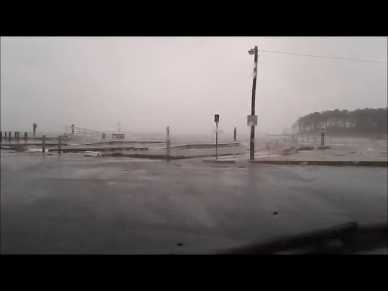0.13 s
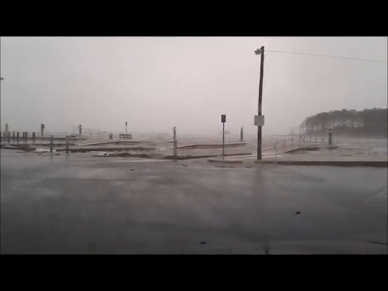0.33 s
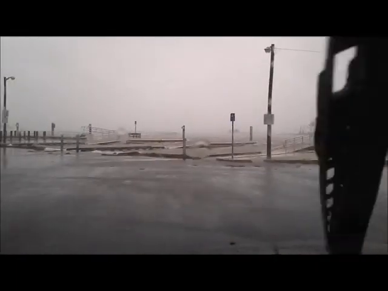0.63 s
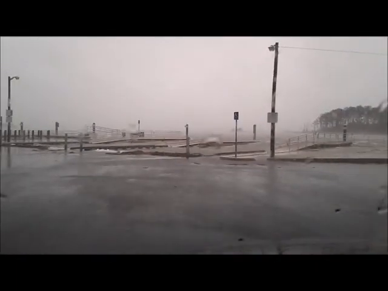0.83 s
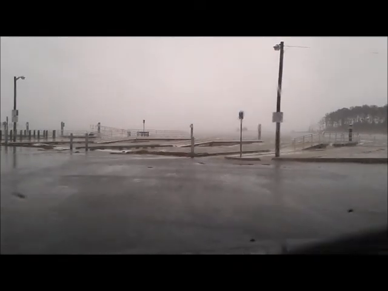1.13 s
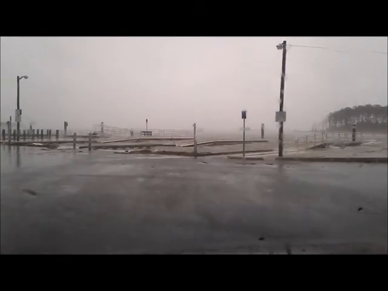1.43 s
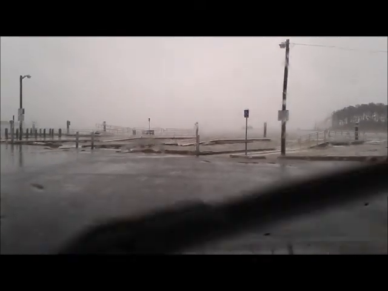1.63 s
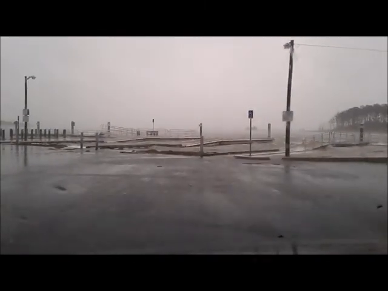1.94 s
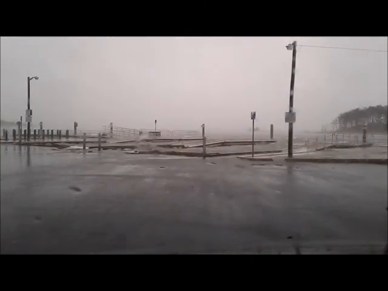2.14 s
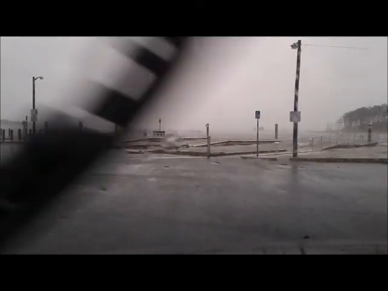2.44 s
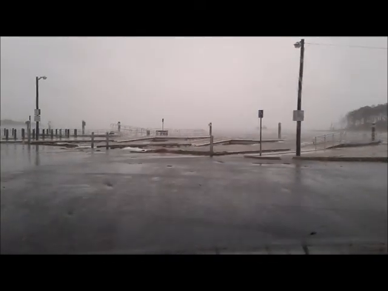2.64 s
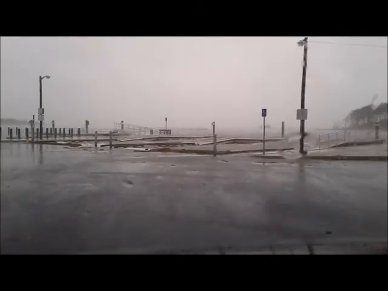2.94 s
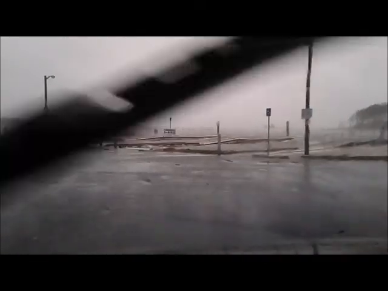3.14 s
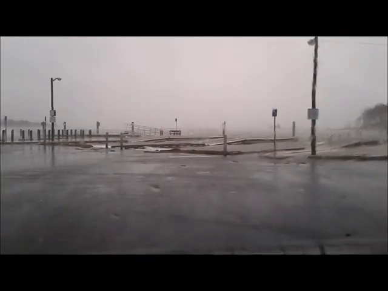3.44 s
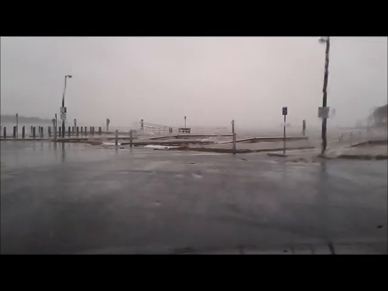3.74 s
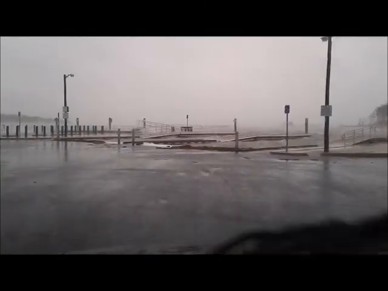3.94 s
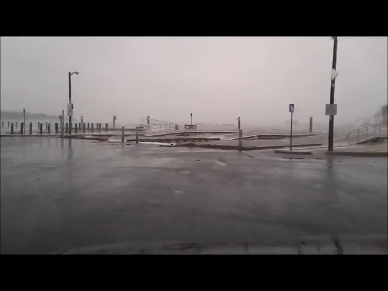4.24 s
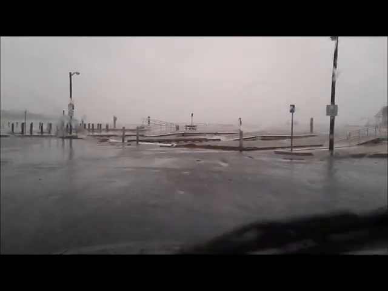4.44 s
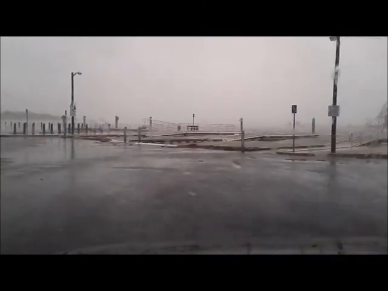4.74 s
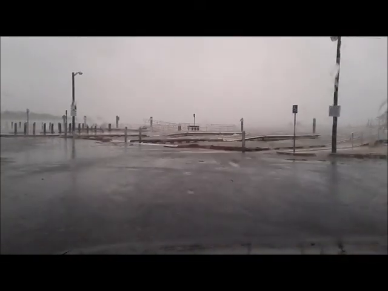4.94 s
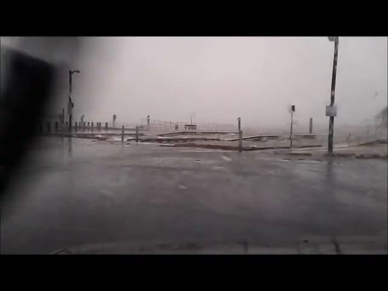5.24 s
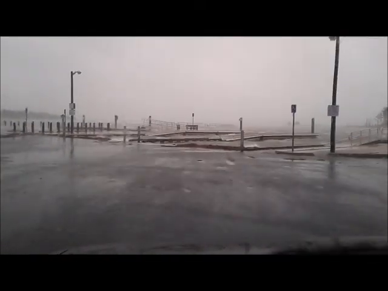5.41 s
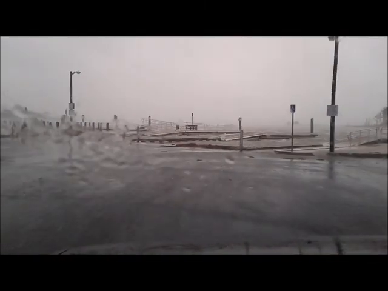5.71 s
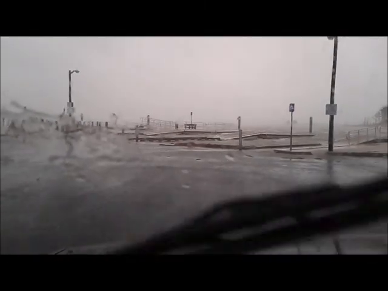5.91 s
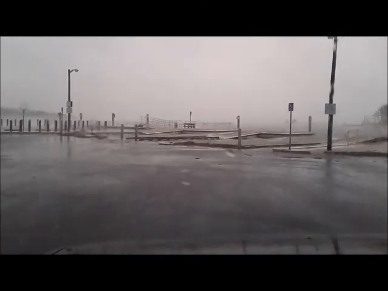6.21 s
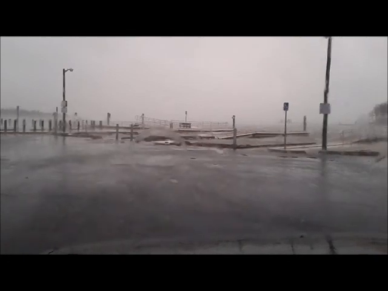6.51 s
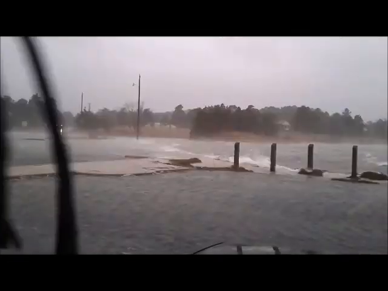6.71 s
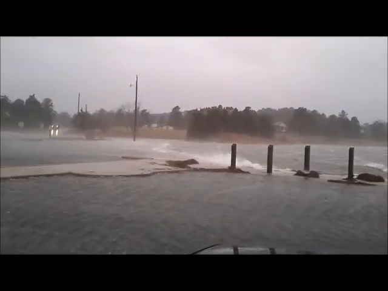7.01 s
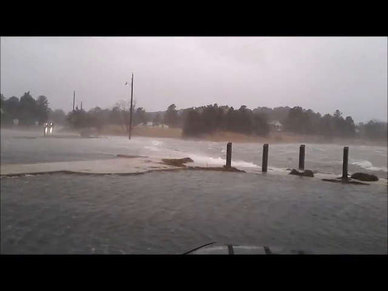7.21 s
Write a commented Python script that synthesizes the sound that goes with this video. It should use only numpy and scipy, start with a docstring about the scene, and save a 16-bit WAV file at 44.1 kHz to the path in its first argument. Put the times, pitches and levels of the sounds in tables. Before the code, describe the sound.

From inside a vehicle standing in a storm, crisp raindrops tick on the glass and panels amid gusty, hissing spray. The cabin sounds close, with very little echo. A steady deep rumble from the bodywork and the hum of the idling engine run throughout, while a wiper blade shudders softly on the windshield several times. The sheet metal takes one duller tap midway, and the sound cuts off suddenly.

```python
"""Inside a parked vehicle, wind-driven rain beats on the glass and roof.
Single drops crack and make the panels knock, over a fine patter that comes in gusts. The roof and doors
drum, and the idling engine hums underneath. A rubber wiper blade groans now and then as it sticks and
slips, and one duller tap rings the sheet metal. The sound stops abruptly shortly before the end."""
import sys
import numpy as np
from scipy import signal
from scipy.fft import rfft, irfft
from scipy.io import wavfile
from scipy.ndimage import uniform_filter1d

SR = 44100
rng = np.random.default_rng(int(sys.argv[2]) if len(sys.argv) > 2 else 0)


def generate_wav(signal):
    """Clip the signal to [-1, 1] and save it as 16-bit WAV at the path in sys.argv[1]."""
    frames = np.transpose(np.atleast_2d(signal))
    scaled = np.clip(frames, -1, 1) * 32767
    pcm = np.round(scaled).astype(np.int16)
    wavfile.write(sys.argv[1], SR, pcm)


N = 324576
STOP_S = 6.7745

# How strong the fine rain is as gusts come and go: (time [s], relative level [dB])
GUSTS = [(0, -47), (.2, -40.5), (.3, -33.5), (.5, -32.5), (.62, -42), (1.05, -40.5), (1.27, -36),
         (1.45, -46), (1.85, -48), (2.1, -39.5), (2.4, -44), (2.5, -36.5), (2.7, -43), (2.8, -46),
         (3.1, -47.5), (3.45, -48.5), (3.53, -39), (3.66, -53), (3.75, -41.5), (4.05, -41.5), (4.17, -45),
         (4.28, -37), (4.5, -42), (4.57, -43.5), (4.6, -31.5), (4.65, -36), (4.8, -40), (4.9, -45),
         (5.25, -46), (5.4, -38), (5.5, -48), (5.7, -45), (5.8, -39.5), (5.93, -40), (6.1, -43),
         (6.23, -41), (6.45, -40), (6.78, -33.5)]
# Short breaks in the rain, and one short surge: (start [s], length [s], level change [dB])
RAIN_BREAKS = [(0.017, 0.13, -10), (0.522, 0.083, -16), (0.797, .18, -14.5), (0.632, 0.038, -10),
               (0.738, 0.07, -14), (1.476, 0.13, -3), (2.146, 0.081, -8), (2.898, 0.14, -4.5),
               (3.626, .05, 6), (4.318, 0.085, -14), (4.415, 0.064, -9), (5.012, 0.14, -16.5),
               (5.418, 0.12, -4), (5.692, 0.044, -9), (6.099, 0.044, -4.5), (6.261, 0.11, -10),
               (6.716, 0.033, -10.5)]
# The tone of fine spray on the glass: (frequency [Hz], relative level [dB])
GLASS_TONE = [(4000, -24), (5500, -5), (7500, -3), (10500, 6), (13000, -5), (16000, -5.5)]
# The tone of fine spray on the roof: (frequency [Hz], relative level [dB])
ROOF_TONE = [(500, -32), (1200, -6), (2000, -11.5), (3300, 0.5), (4500, -6), (6500, -6.5), (9000, -37.5)]
# The tone of faraway rain: (frequency [Hz], relative level [dB])
FAR_RAIN_TONE = [(900, -30), (1800, 0), (4000, -3), (9000, -6), (12000, -10), (15500, -30)]
# How strongly the vehicle's body drums: (time [s], relative level [dB])
DRUMMING = [(0.0, -32.5), (4.54, -34), (4.68, -31), (4.79, -33), (6.64, -32.5), (6.77, -33)]
# The deep tone of that drumming: (frequency [Hz], relative level [dB])
BODY_TONE = [(12, -40.5), (28, -8), (42, 0), (62, -6.5), (88, -0.5), (165, -4), (230, -6.5), (345, -9.5),
             (420, -15.5), (700, -19.5), (1000, -25.5), (1700, -34), (2500, -38), (4000, -62.5)]
# The loudest drops; knock and splatter rise and fall with the crack's level:
# (time [s], crack level [dB], crack pitch [Hz], relative knock [dB], relative splatter [dB])
LOUD_DROPS = [(.0169,-9,10800,-14,-30),(.0573,-22,9000,6.5,-11.5),(.0695,-26,9300,1,-16),(.1613,-17,7000,-13,-29),
              (.2258,-18,10100,1.5,-22),(.2329,-9,11200,-3,-23),(.267,-17,8500,6,-21),(.2744,-5,10800,-7,-19),
              (.3173,-16.5,7000,-9,-16.5),(.3425,-18,10000,-7,-19.5),(.3767,-15.5,10000,-11.5,-9.5),(.4528,-23,9900,-3,-20),
              (.4936,-14,11200,6,-18),(.5652,-17,10300,-5.5,-12),(.6061,-10,11200,-4,-18.5),(.6139,-16,10300,-3,-15.5),
              (.7856,-7.5,7940,-3,-19),(.809,-21,10200,-6,-13),(.841,-23,7500,1.5,-9.5),(.8829,-15.5,11000,-2.5,-15),
              (.9218,-19,10100,-5,-14.5),(.9308,-18,9600,1,-14.5),(.9908,-22,10900,-1,-19),(1.0279,-10.5,11000,-8,-23),
              (1.1046,-18,11200,-12,-12),(1.167,-23,11100,12,-23),(1.204,-7,11200,-9,-23),(1.2336,-8.5,10900,-4.5,-17),
              (1.2571,-13,9400,3,-23),(1.2659,-6,11500,-2,-20),(1.364,-10,10600,-7,-20),(1.454,-10,11200,-4.5,-19.5),
              (1.5122,-18.5,8400,6.5,-23),(1.572,-9.5,9200,-3,-20.5),(1.5844,-20.5,8000,1,-18),(1.7153,-25,9100,8,-14),
              (1.8869,-17,10900,-7,-9),(1.9673,-18,9300,-5,-12),(1.9941,-7.5,8500,-10,-21),(2.0463,-6.5,10100,-17,-12),
              (2.0766,-18,9200,-13,-20),(2.0845,-19,10900,0.5,-7.5),(2.1314,-22,11300,-10,-12),(2.1603,-15.5,9600,-2,-13),
              (2.1939,-21.5,10900,-2.5,-7.5),(2.2314,-16,10700,-0.5,-8),(2.2449,-9,11000,1.5,-17.5),(2.2809,-16,9500,-9,-11.5),
              (2.329,-10.5,11200,-1.5,-22.5),(2.4226,-7.5,10400,-9,-13),(2.4759,-13,10300,0.5,-13),(2.491,-13.5,6600,-10,-14),
              (2.5361,-24,9500,6,-11),(2.6062,-5.5,10100,-15,-15.5),(2.6251,-4,10600,-24,-16),(2.6463,-11.5,9600,-18,-15),
              (2.6903,-13,10400,-20,-15),(2.7074,-15,10700,-14,-21),(2.7751,-19.5,10100,-7.5,-14),(2.8382,-13,10000,1,-18),
              (3.0129,-7.5,10300,-4,-23),(3.0297,-21,9500,-1,-10),(3.0993,-11.5,10300,-9,-20),(3.1118,-17,10100,-12,-14),
              (3.1188,-12.5,10400,-6,-13.5),(3.2176,-12.5,9500,-1,-18),(3.2474,-18,10900,-3.5,-14),(3.2827,-10,9450,-12,-20),
              (3.3036,-20.5,10300,0,-12),(3.3574,-20,8500,-0.5,-14.5),(3.4476,-11.5,11000,-17,-15.5),(3.4597,-24,9700,5,-10),
              (3.5083,-13,10600,-7,-12),(3.6778,-15.5,10100,-19,-14.5),(3.7082,-9,9600,-5,-20.5),(3.7272,-9.5,10000,-10,-10),
              (3.8044,-15,10200,-15,-14),(3.9183,-17,9300,-9,-9),(3.9327,-13,11200,-25,-14),(4.041,-25,10100,-13,-18),
              (4.0887,-13.5,10700,-3,-16),(4.1353,-5,10500,-15.5,-16.5),(4.1788,-9,10300,-11,-14),(4.2626,-21.5,9200,-4,-6.5),
              (4.2866,-13,11200,-16,-17),(4.3067,-12,11000,1,-20),(4.4025,-26,6000,1,-15),(4.5121,-15,9000,-1,-20),
              (4.5937,-10.5,9450,-8.5,-17.5),(4.6056,-15.5,10900,3,-13.5),(4.6214,-30,9100,6.5,-6),(4.7586,-15.5,6000,-4.5,-12),
              (4.8763,-20.5,11100,-14,-14.5),(4.8878,-9,10600,-9,-14),(4.8957,-6.5,10000,-12,-17),(4.9459,-18.5,10300,-1,-11),
              (4.9806,-27.5,8100,9.5,-14),(4.9969,-16,10200,-4,-16),(5.2073,-6,10400,-9,-18),(5.2518,-8.5,11600,2.5,-25),
              (5.272,-14.5,9300,-31.5,-13),(5.3533,-10.5,11000,-19,-12.5),(5.3991,-19,9000,-13,-7),(5.4073,-4,10600,-19,-12.5),
              (5.461,-23,6700,-6,-12),(5.5343,-10.5,11700,-2.5,-18),(5.5482,-28.5,6000,10.5,-12.5),(5.6871,-17.5,9900,-7.5,-15.5),
              (5.7338,-17.5,8800,-5,-15.5),(5.9037,-5.5,9400,-9,-23),(5.9275,-18,9400,1.5,-13.5),(5.9568,-24.5,10200,5,-8),
              (6.022,-20,10500,-12,-13),(6.0961,-10.5,10100,-15.5,-22),(6.1566,-16,10900,-4,-19),(6.1743,-17,10800,-2,-15),
              (6.1984,-15.5,8700,-8,-17),(6.3847,1.5,9400,-19,-21),(6.4079,-14.5,10900,-5.5,-10),(6.4561,-7.5,9200,-5.5,-19),
              (6.4989,-11.5,8700,-2,-14.5),(6.5122,-8,10400,-14.5,-23),(6.5353,-7,10700,0.5,-25),(6.5668,-14,10600,-15,-25),
              (6.5892,-17,9500,-2,-12),(6.6042,-15,9200,-8,-18),(6.6421,-21,11200,-11,-11),(6.6854,-14,9100,-13,-17),
              (6.7028,-12,10700,-18,-22),(6.756,-16,9200,-14,-9),(6.7631,-16,10200,-20,-31)]
# The wiper blade shuddering on the glass: (start [s], length [s], pitch [Hz], level [dB])
WIPER_GROANS = [(.48, .09, 112, -35), (.78, .08, 112, -36), (.895, .08, 112, -30), (2.28, .12, 112, -37),
                (3.3, .11, 158, -35), (3.46, .13, 165, -35), (4.57, .2, 161, -31), (6.15, .13, 160, -38),
                (6.43, .2, 168, -39)]
# A duller tap on the body: (time [s], pitch [Hz], starting level [dB], time to fade by 60 dB [s])
METAL_TAPS = [(3.033, 930, -31, .06)]
# The microphone softens the highest sounds: (frequency [Hz], level change [dB])
MICROPHONE_TONE = [(0, 0), (12000, 0), (12400, -3.5), (22000, -9), (SR / 2, -7)]


def gain_of(db):
    """Turns decibels into a number to multiply a sound by."""
    return 10 ** (np.asarray(db) / 20)


def evened(x):
    """Scales a signal so its average strength (rms) is 1."""
    return x / np.sqrt(np.mean(x ** 2) + 1e-20)


def drift(smooth_s):
    """A random wobble of strength 1, smoothed over smooth_s seconds."""
    size = max(round(smooth_s * SR), 1)
    return evened(uniform_filter1d(uniform_filter1d(rng.standard_normal(N), size), size))


def noise(tone, size, patchy_db):
    """Noise with a given tone and drifting loud and soft patches, built in slices of size samples."""
    slices, hz = 4 * N // size + 5, np.fft.rfftfreq(size, 1 / SR)
    real, imaginary, patches = rng.standard_normal((slices, len(hz), 3)).T
    patches = evened(uniform_filter1d(uniform_filter1d(patches, size=6, axis=0), size=6, axis=1))
    table_hz, table_db = np.transpose(tone)
    tone_db = np.interp(np.log(hz + 1), np.log(table_hz + 1), table_db)[:, None]
    spectra = (real + 1j * imaginary) * gain_of(tone_db + patchy_db * patches)
    return evened(signal.istft(spectra, nperseg=size, noverlap=3 * size // 4)[1][:N])


def gust(t):
    """The rain's level and the roof's share of it, in dB at times t. Weaker rain sounds duller."""
    start, length, change_db = np.transpose(RAIN_BREAKS)[..., None]
    in_break = np.clip(np.minimum(t - start, start + length - t) / .015, 0, 1)  # 15 ms fades
    level_db = np.interp(t, *np.transpose(GUSTS)) + (change_db * in_break).sum(0)
    usual_db = -42
    return level_db, 0.5 - 0.3539 * (level_db - usual_db)


def rain_hiss():
    """Flickering spray hits glass and roof in gusts, over the faint, even hiss of faraway rain."""
    level_db, roof_db = gust(np.arange(N) / SR)
    flicker_db = 3.1 * drift(.002) + 2.2 * drift(.013)
    glass = noise(GLASS_TONE, size=256, patchy_db=5.5)
    roof = noise(ROOF_TONE, size=256, patchy_db=4.5)
    spray = gain_of(level_db - 2 + flicker_db) * (glass + gain_of(roof_db - 1.1) * roof)
    return spray + gain_of(-59) * noise(FAR_RAIN_TONE, size=512, patchy_db=0)


def body_drumming():
    """Roof and doors drum in the storm, making a dull, dense noise."""
    level_db = np.interp(np.arange(N) / SR, *np.transpose(DRUMMING)) - 0.5
    return gain_of(level_db) * noise(BODY_TONE, size=4096, patchy_db=1.5)


def engine_hum(firing_hz=64.3, level_db=-38.3):
    """The idling engine fires fast enough to make a low tone, which wavers a little."""
    cycles = np.cumsum(firing_hz * (1 + .008 * drift(.3))) / SR
    return gain_of(level_db + 0.51 * drift(0.029)) * np.sqrt(2) * np.sin(2 * np.pi * cycles)


def raindrops(rows):
    """Each drop is a sharp tick and a short splatter that ring a high crack and a lower panel knock."""
    start, level_db, crack_hz, knock_db, splatter_db = np.transpose(rows)[..., None]
    size, lead = 1024, 66  # in samples; the drop's rim lands early by lead
    hz = np.fft.rfftfreq(size, 1 / SR)
    age = (np.arange(size) - lead) / SR
    draws = rng.standard_normal((len(start), size + 1))
    knock_hz = 3400 * np.exp(.12 * draws[:, :1])

    def ring(pitch_hz, width_hz, fade_s, boost_db):
        """Tick and splatter make the surface ring around one pitch."""
        resonance = 1j * hz * width_hz / (pitch_hz ** 2 - hz ** 2 + 1j * hz * width_hz)
        tick = irfft(rfft(age == 0) * resonance)
        hiss = draws[:, 1:] / np.linalg.norm(irfft(resonance), axis=1, keepdims=True)
        rise_and_fall_db = -60 * np.where(age < 0, -age / 0.0063, age / fade_s)
        splatter = hiss * gain_of(splatter_db + boost_db + rise_and_fall_db)
        return tick / abs(tick).max(1, keepdims=True) + irfft(rfft(splatter) * resonance)

    crack = ring(crack_hz, width_hz=5500, fade_s=.017, boost_db=3.5)
    knock = ring(knock_hz, width_hz=2400, fade_s=.037, boost_db=5.8)
    sounds = gain_of(level_db) * (crack + gain_of(knock_db - 5.5) * knock)
    out = np.zeros(N + size)
    np.add.at(out, np.round(start * SR).astype(int) + np.arange(size), sounds)
    return out[lead:N + lead]


def patter(per_s, above_db, spread_db):
    """Drops land at random moments, louder in gusts; spread_db makes a few stand out."""
    times = np.cumsum(rng.exponential(1, 4000)) / per_s
    rarity, crack, knock, wet = rng.random((4000, 4))[times < STOP_S].T
    times = times[times < STOP_S]
    gust_db, roof_db = gust(times)
    level_db = gust_db + above_db - spread_db * np.log(np.maximum(rarity, .05))
    crack_hz, knock_db, splatter_db = 7000 + 5000 * crack, roof_db - 7 + 8 * knock, -19 + 8 * wet
    return raindrops(np.transpose([times, level_db, crack_hz, knock_db, splatter_db]))


def cabin_echo(sound, fade_s=0.089):
    """Seats and lining keep the echo short. Drops land all over, so three echoes take turns."""
    t = np.arange(round(.1 * SR)) / SR
    echoes = rng.standard_normal((3, len(t))) * gain_of(-60 * t / fade_s) * (t > .0015)
    echoes /= np.linalg.norm(echoes[0])
    shares = np.cos(np.pi * (np.arange(N) / SR * 7 + np.arange(3)[:, None] / 3)) * np.sqrt(2 / 3)
    return sound + gain_of(-12.5) * signal.oaconvolve(sound * shares, echoes, axes=1).sum(0)[:N]


def wiper_groans():
    """Rubber sticks and slips on the glass, making an unsteady low tone with weak overtones."""
    out, wobble, grip = np.zeros(N), drift(0.019), drift(0.0053)
    for start, length, hz, db in WIPER_GROANS:
        span = slice(round(start * SR), round((start + length) * SR))
        phase = 2 * np.pi * np.cumsum(hz * (1 + .025 * wobble[span])) / SR
        tone = np.sin(phase) + gain_of(-21.5) * np.sin(2 * phase) + gain_of(-22) * np.sin(3 * phase)
        fade_in_out = signal.windows.tukey(len(phase), .6)
        out[span] += gain_of(db + 2.7 * grip[span]) * np.sqrt(2) * tone * fade_in_out
    return out


def metal_tap():
    """A short rattle makes the sheet metal ring dully and die away."""
    out, t = np.zeros(N), np.arange(3000) / SR
    for start, hz, db, fade_s in METAL_TAPS:
        rattle = rng.standard_normal(len(t))
        ring = evened(signal.lfilter(*signal.iirpeak(hz, Q=2.5, fs=SR), rattle))
        out[round(start * SR):][:len(t)] += gain_of(db - 60 * t / fade_s) * ring
    return out


def scene():
    """Rain and the tap echo in the cabin, over the drumming, engine and wiper."""
    loud_drops = raindrops(LOUD_DROPS)
    small_drops = patter(per_s=300, above_db=8.5, spread_db=2)
    medium_drops = patter(per_s=16, above_db=18, spread_db=0)
    rain = loud_drops + small_drops + medium_drops + rain_hiss()
    return (cabin_echo(rain + metal_tap()) + body_drumming() + engine_hum() + wiper_groans())[None]


def record(dry):
    """The microphone softens the highs, the sound cuts off, and the very lowest and highest parts go."""
    hz, db = np.transpose(MICROPHONE_TONE)
    heard = signal.oaconvolve(dry, signal.firwin2(63, hz, gain_of(db), fs=SR)[None], "same")
    stopped = heard * (np.arange(N) < STOP_S * SR)
    lowest_hz, highest_hz = 1.4, 15850
    centred = signal.lfilter([1, -1], [1, -np.exp(-2 * np.pi * lowest_hz / SR)], stopped)
    treble_cut = signal.firwin(511, highest_hz, window=("kaiser", 9), fs=SR)
    return signal.oaconvolve(centred, treble_cut[None], "same")


dry = scene()
out = record(dry)
generate_wav(out)
```